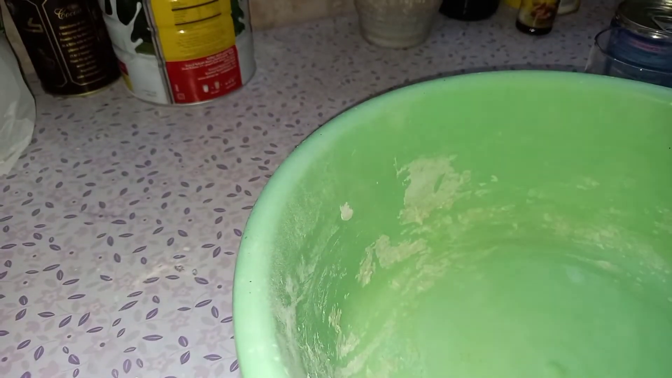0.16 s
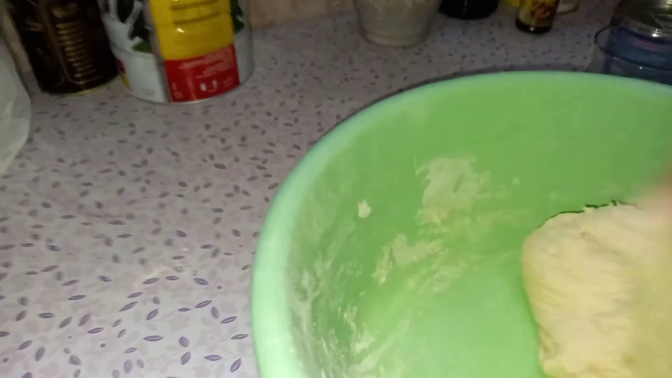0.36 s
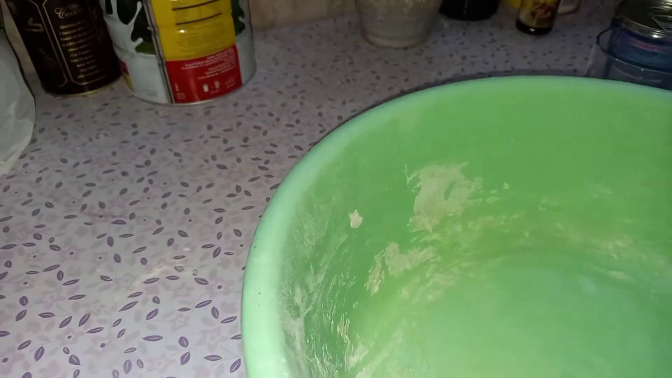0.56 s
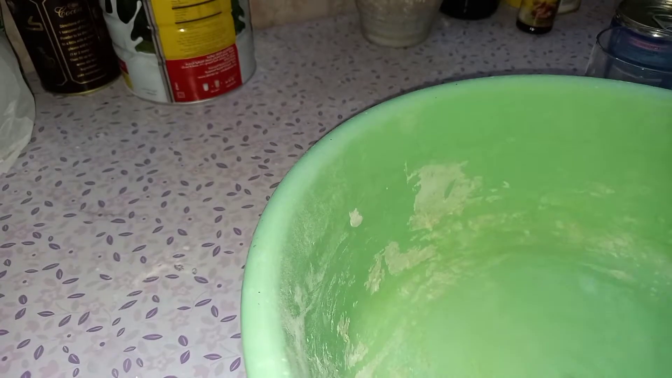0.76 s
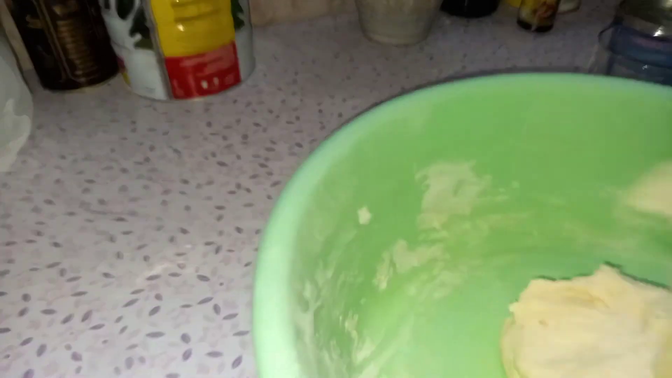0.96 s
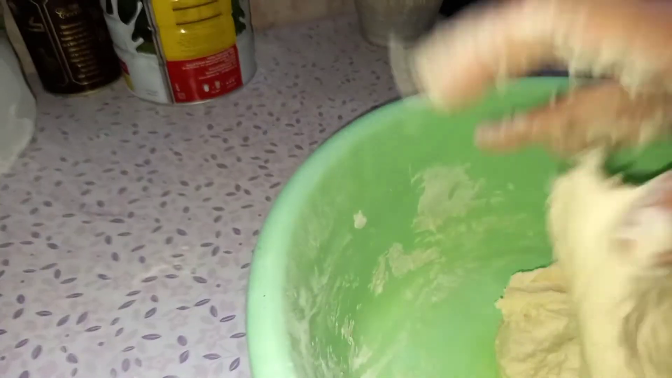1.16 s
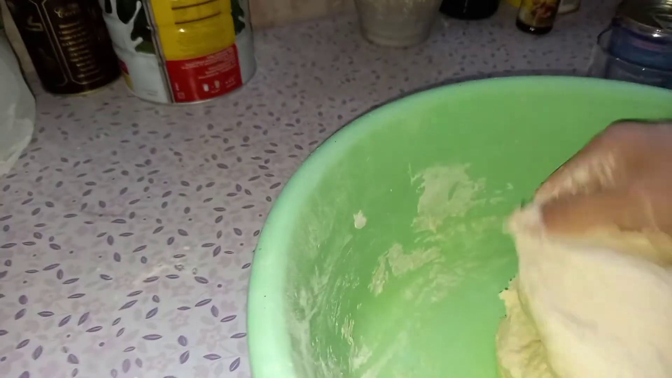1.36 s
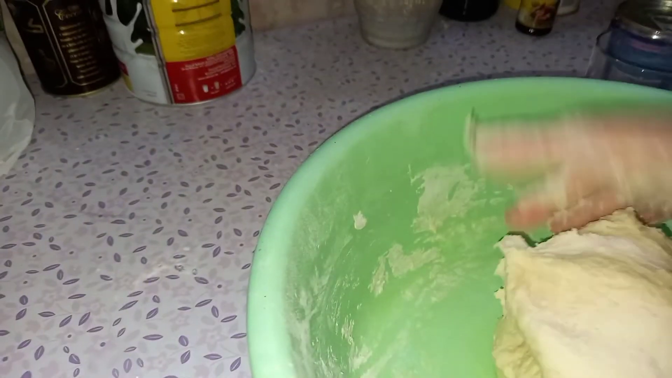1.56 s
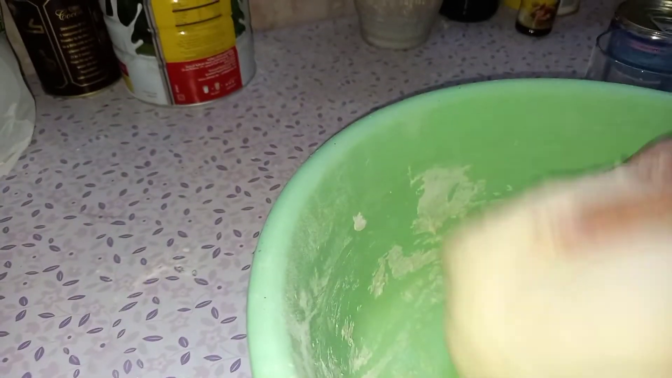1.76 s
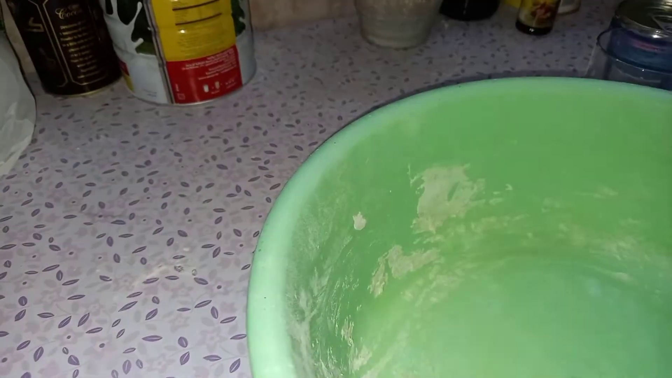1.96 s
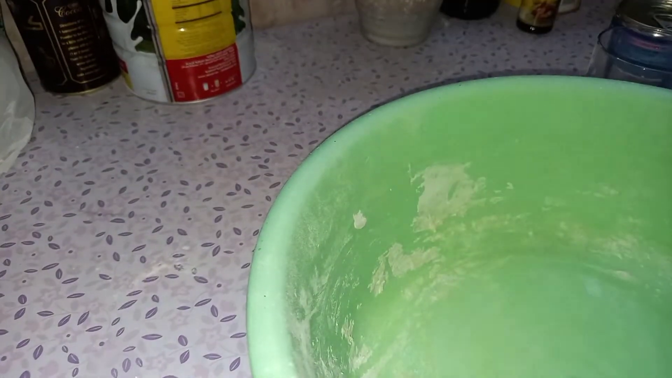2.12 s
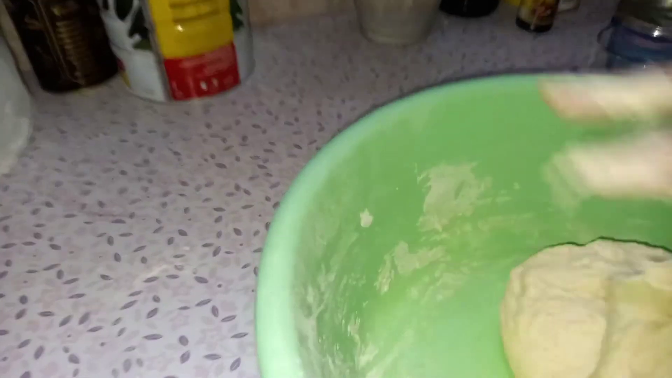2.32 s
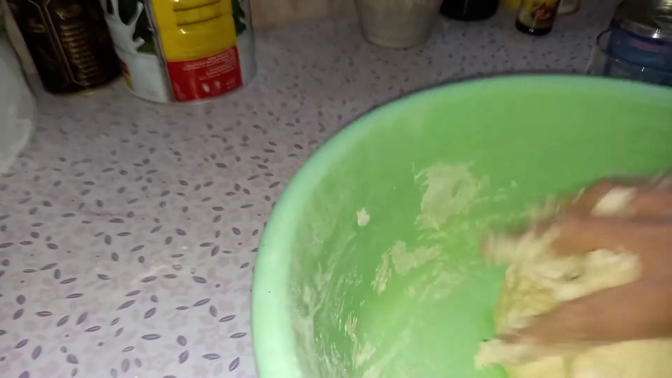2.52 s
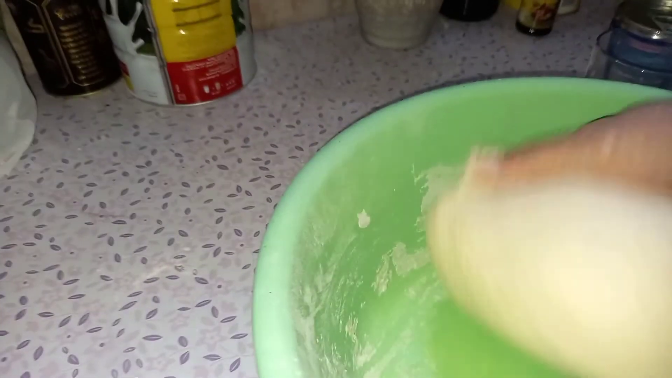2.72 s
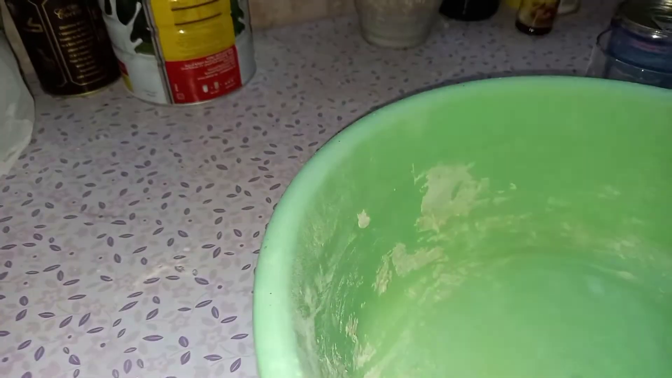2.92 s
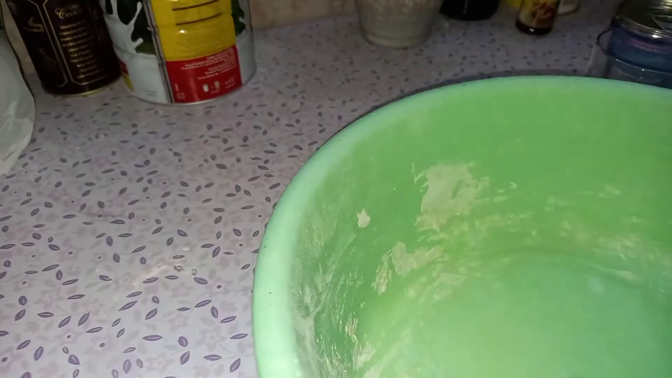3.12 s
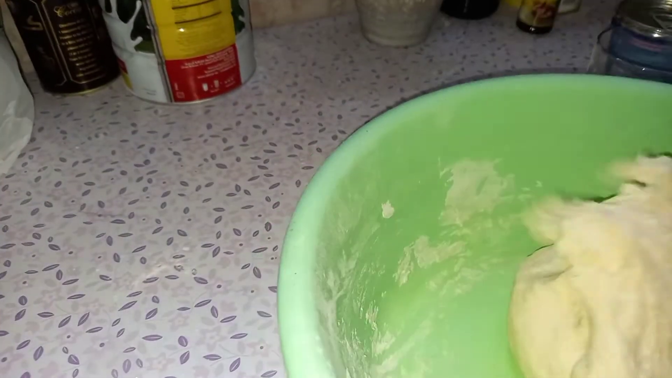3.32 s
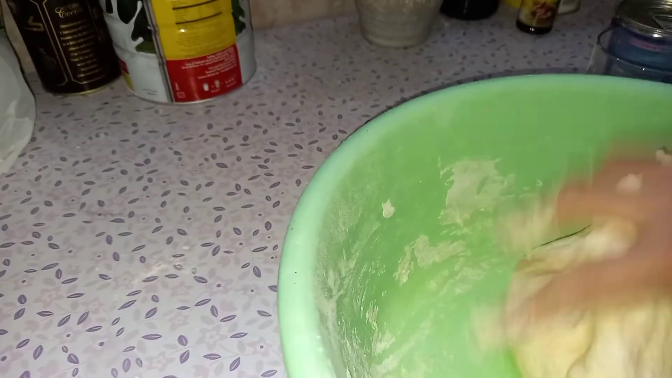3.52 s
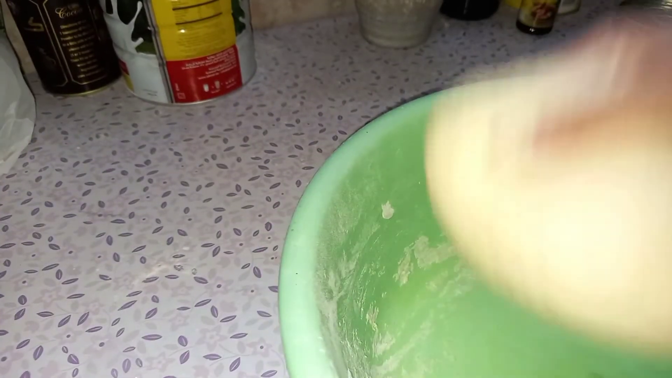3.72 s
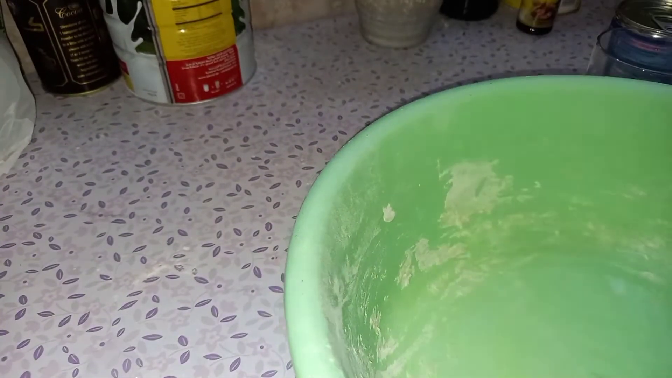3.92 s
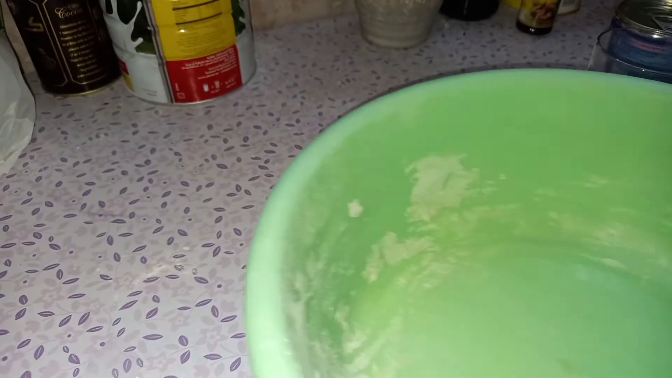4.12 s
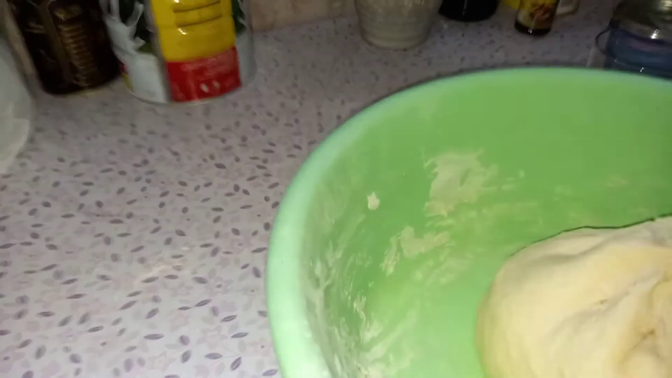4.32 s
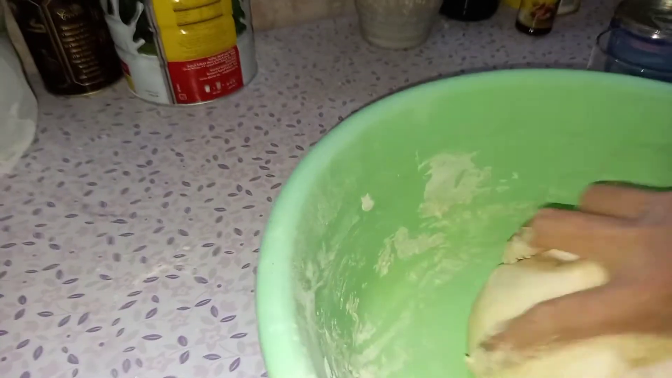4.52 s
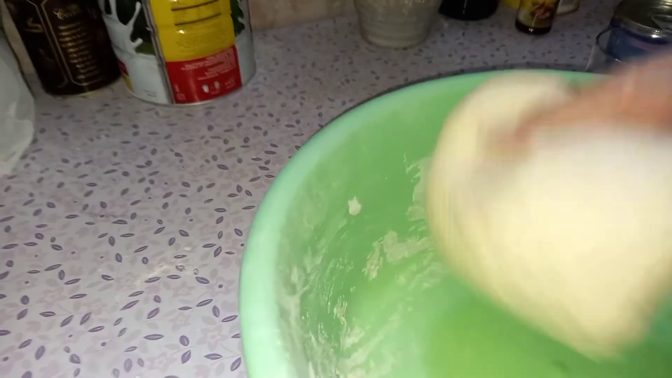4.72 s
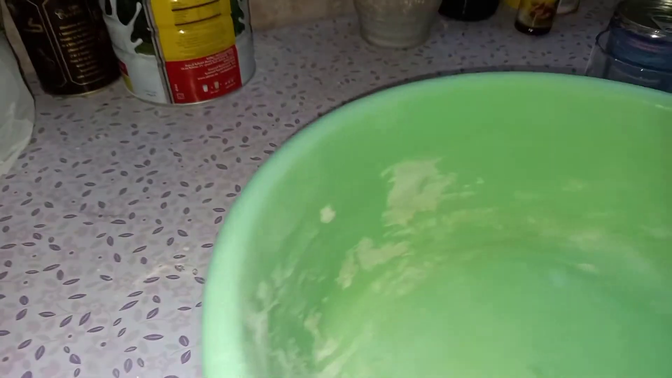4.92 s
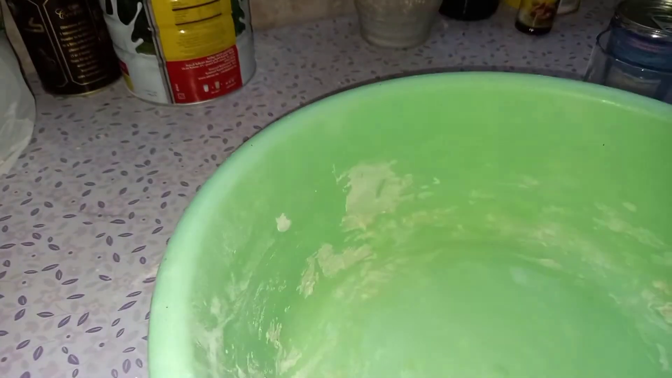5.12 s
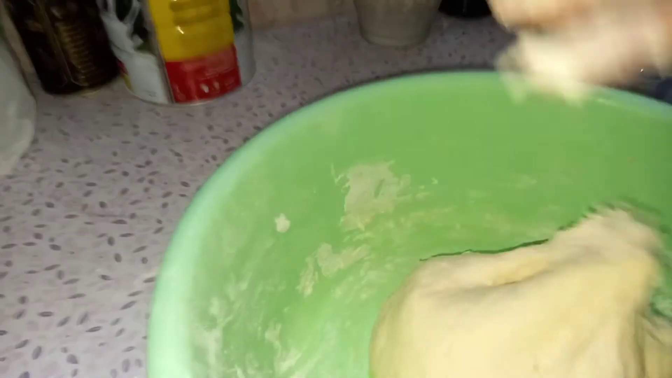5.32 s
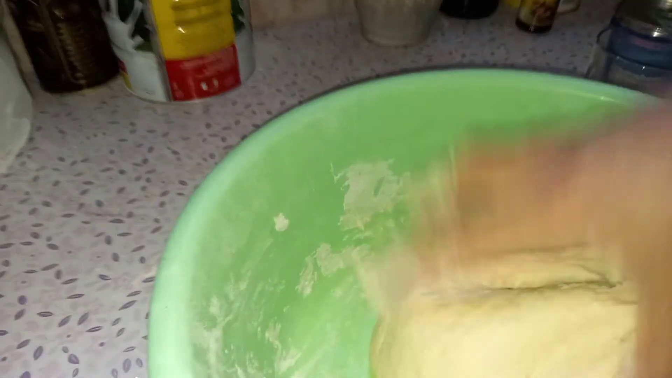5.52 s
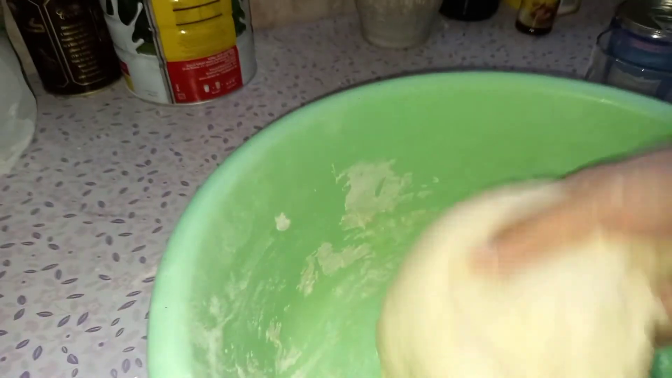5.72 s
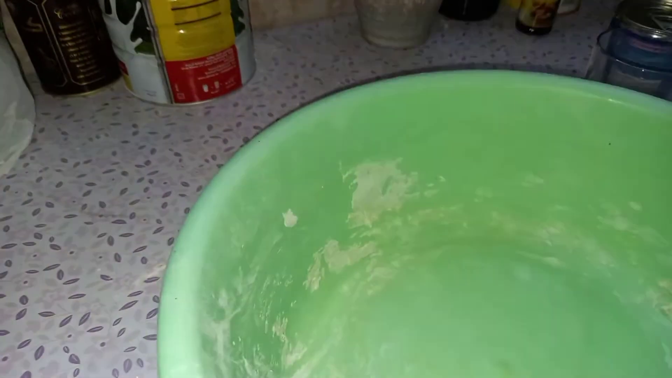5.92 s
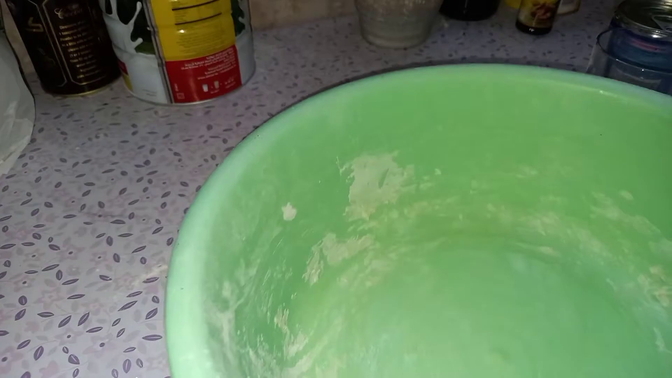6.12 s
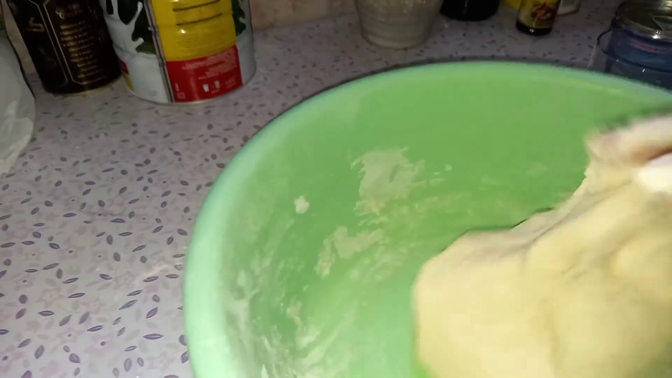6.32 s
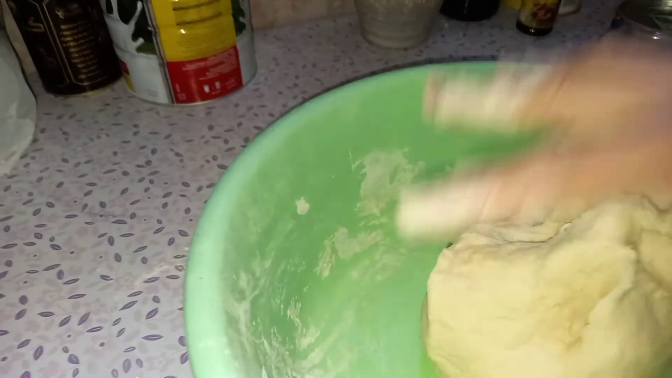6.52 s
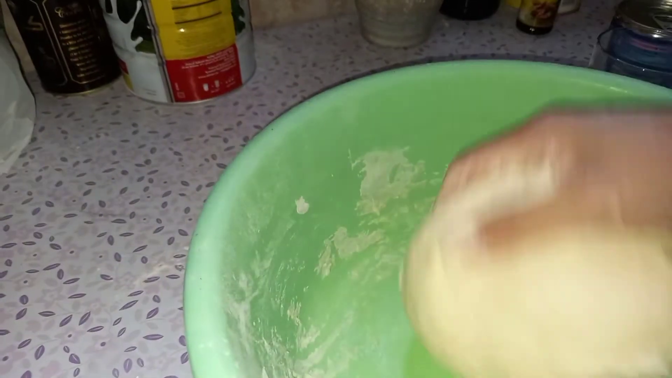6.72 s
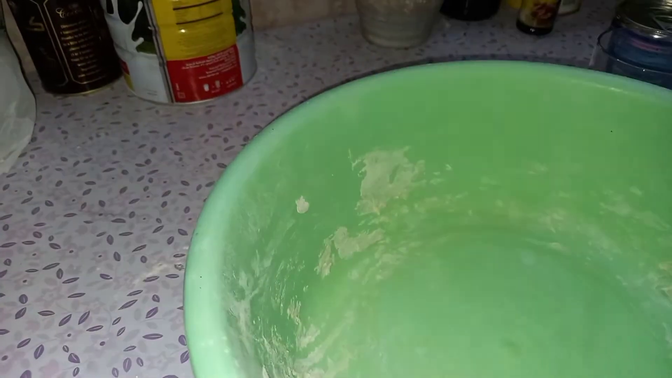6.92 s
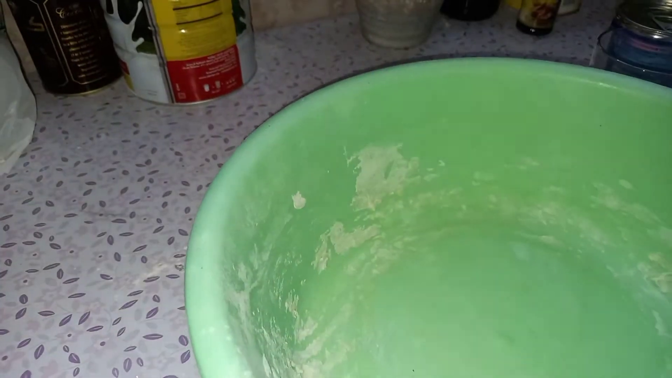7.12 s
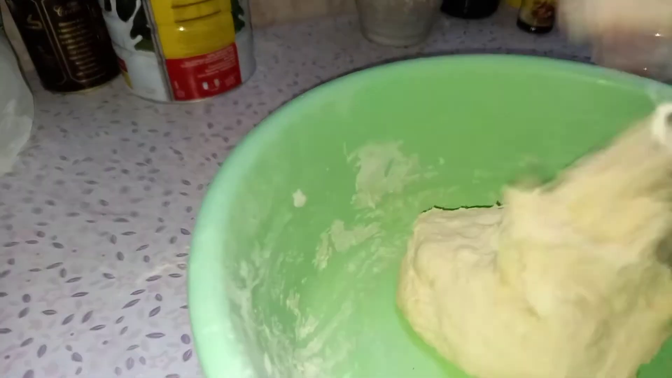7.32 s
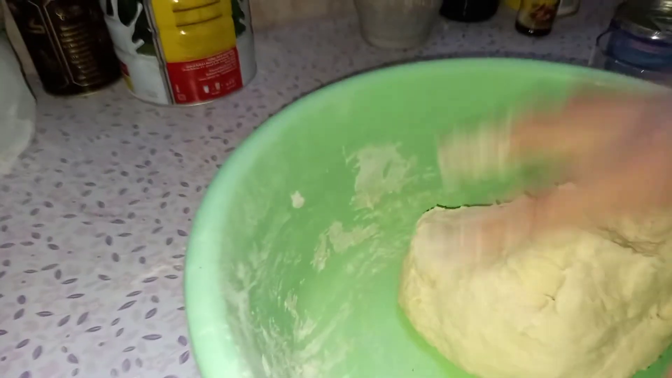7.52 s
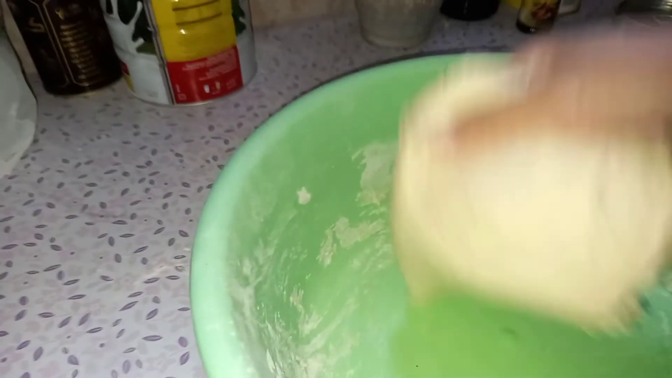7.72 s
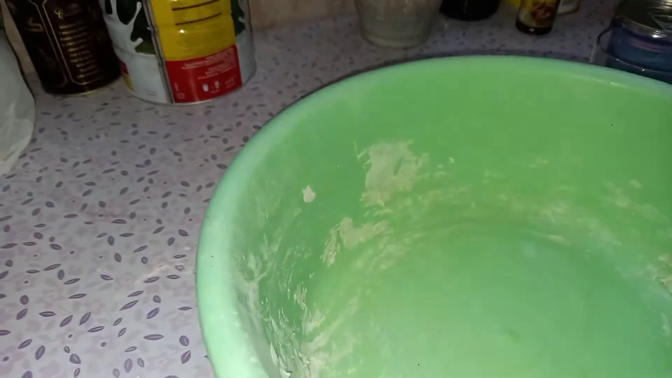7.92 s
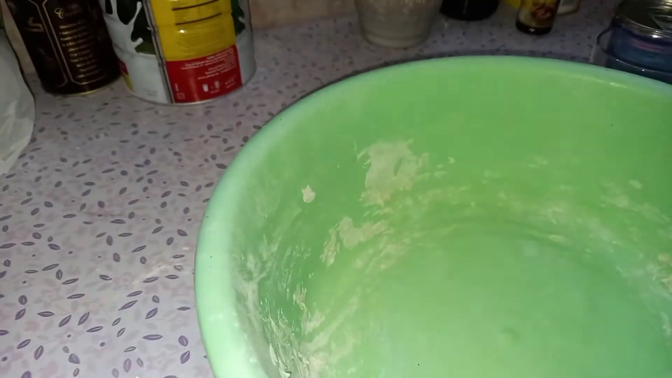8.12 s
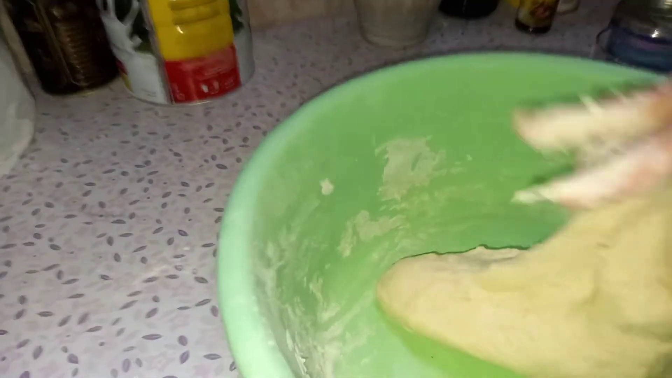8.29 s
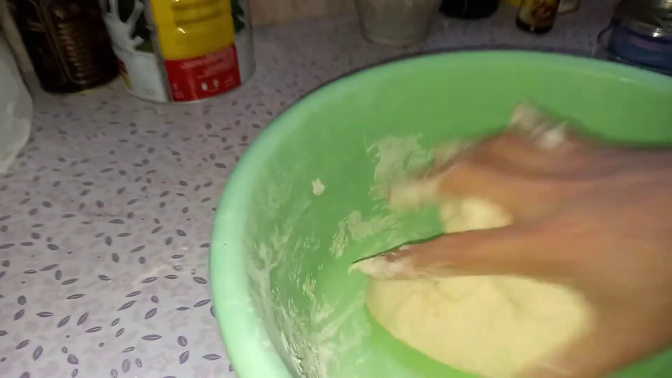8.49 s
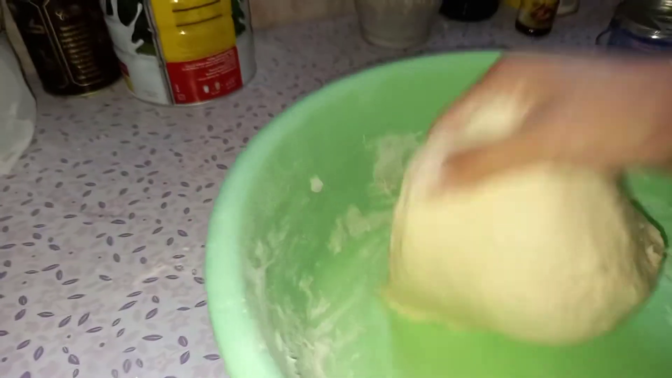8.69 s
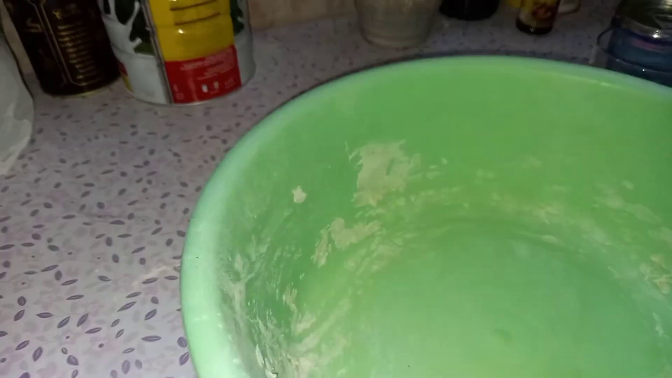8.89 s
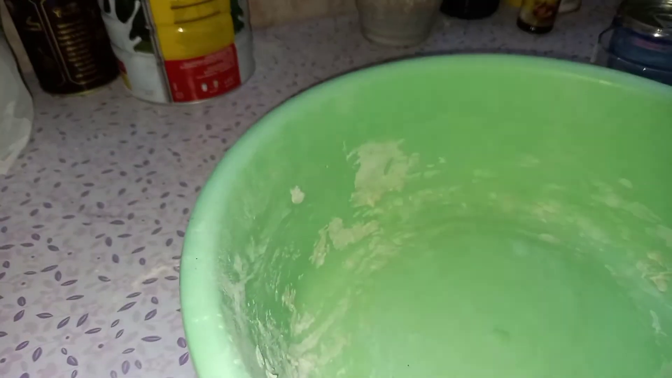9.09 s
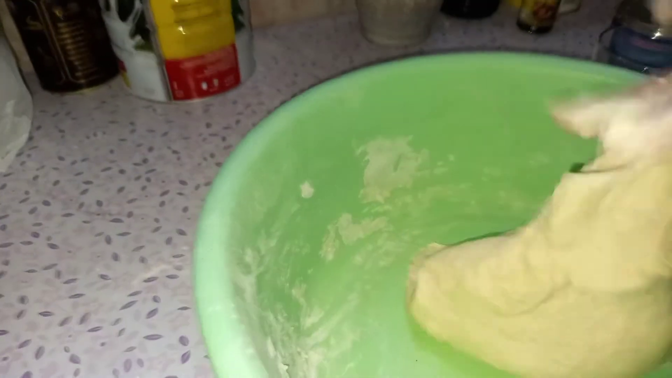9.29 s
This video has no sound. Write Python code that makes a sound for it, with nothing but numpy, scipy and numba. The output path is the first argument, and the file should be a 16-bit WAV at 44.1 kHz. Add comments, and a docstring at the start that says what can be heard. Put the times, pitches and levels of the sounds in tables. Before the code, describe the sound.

Repeated wet, booming dough slams in a plastic bowl on a kitchen counter, with soft pats, peeling and dragging between the blows.

```python
"""Wet slaps and deep booms: a lump of soft dough is thrown again and again into a plastic bowl on a counter.
Each slam is a crackling noise burst, a decaying boom of the counter and a sum of bowl modes; a jar clinks after some.
Between slams, soft blows and grainy friction noise are hands that pat, peel and drag the dough; once a squeak sinks.
A small hard room answers with diffuse decaying noise. Behind it lie a faint two-partial appliance hum and still air."""
import sys
import numpy as np
from scipy import signal
from scipy.fft import rfft, irfft, next_fast_len
from scipy.io import wavfile
from scipy.ndimage import uniform_filter1d
from numba import njit

SR = 44100
rng = np.random.default_rng(int(sys.argv[2]) if len(sys.argv) > 2 else 0)


def boost(x):
    """Linear amplitude factor 10**(x/20) for a level x in decibels (scalar or array-like)."""
    u = np.asarray(x, float) / 20
    return 10 ** u


def dump(signal):
    """Clip the signal to [-1, 1] and save it as 16-bit WAV at the path in sys.argv[1]."""
    limited = np.clip(np.atleast_2d(signal).T, -1, 1)
    pcm = np.round(limited * 32767).astype(np.int16)
    wavfile.write(sys.argv[1], SR, pcm)


N = 412322
T = np.arange(N) / SR  # time in seconds


def on_log(points, hz):
    """Interpolation on a log-frequency axis: a table of (Hz, value) read at the given frequencies."""
    f, v = np.transpose(points)[:2]
    return np.interp(np.log(np.maximum(hz, 1)), np.log(f), v)


def colour(x, points):
    """Minimum-phase filtering: a causal (Hz, dB) spectrum, scaled to keep the power of white noise."""
    gain = boost(on_log(points, np.fft.rfftfreq(2048, 1 / SR)))
    cepstrum = irfft(np.log(gain / np.sqrt(np.mean(gain ** 2))))
    # folding the cepstrum onto positive times makes the response causal
    cepstrum[1:1024] *= 2
    cepstrum[1025:] = 0
    taps = irfft(np.exp(rfft(cepstrum)))
    taps = np.broadcast_to(taps, x.shape[:-1] + taps.shape)
    return signal.oaconvolve(x, taps, axes=-1)[..., :x.shape[-1]]


def band(x, lo_hz, hi_hz):
    """Band-pass filtering, scaled to keep the power of white noise."""
    sos = signal.butter(2, [lo_hz, hi_hz], "band", fs=SR, output="sos")
    return signal.sosfilt(sos, x) * np.sqrt(SR / 2 / (hi_hz - lo_hz))


def wide(size, alike):
    """Interchannel coherence: two noises whose likeness follows a (Hz, 0-1) table."""
    c = np.clip(on_log(alike, np.fft.rfftfreq(size, 1 / SR)), 0, 1)
    mid, side = rfft(rng.standard_normal((2, size)))
    mid = mid * np.sqrt((1 + c) / 2)
    side = side * np.sqrt((1 - c) / 2)
    return irfft(np.array([mid + side, mid - side]), size)


def walk(rate):
    """Smoothed random fluctuation: fresh values at the given rate per second, with spread near 1."""
    k = int(SR / rate)
    steps = np.repeat(rng.standard_normal(N // k + 1), k)
    return 0.65 * uniform_filter1d(uniform_filter1d(steps, k), k)[:N]


def fade(t, t60):
    """Exponential decay: the amplitude falls by 60 dB in t60 seconds."""
    return np.exp(-np.log(1000) * t / t60)


def swell(start_s, length_s, power=2):
    """Raised-sine envelope: the given power of half a sine, zero outside its span."""
    return np.sin(np.pi * np.clip((T - start_s) / length_s, 0, 1)) ** power


# Modes of bowl and counter. Each row: nominal frequency in Hz, relative level in dB, decay time t60 in seconds.
BOWL_MODES = [(100, 5.5, 0.25), (124.7, 0, 0.39), (153.2, 2.5, 0.27), (175, -2.5, 0.14), (243.3, -4, 0.29),
              (286.1, 1, .22), (314, -27, 1.1), (337.6, 5, 0.11), (395, -3, 0.034), (442, -27, 0.36),
              (492, -9, 0.3), (560, -5, 0.17), (690, -9, 0.28), (835, -7.5, 0.072), (918, -5.5, 0.13),
              (1600, -8.5, 0.065)]
# Basic spectrum of the slap. Each row: frequency in Hz, relative density in dB per Hz.
SLAP_SPECTRUM = [(100, -2), (300, -1.5), (700, 1.5), (1000, -1.5), (1250, -4), (1600, 4), (1900, -6.5),
                 (2600, -7.5), (4000, -14), (5500, -12.5), (6600, -15.5), (9000, -19), (13000, -12.5),
                 (16000, -22.5)]
# Likeness of left and right in the slap from a broad patch. Each row: frequency in Hz, likeness from 0 to 1.
PATCH_LIKENESS = [(200, 0.4), (600, 0.25), (1500, 0.02), (5000, 0), (16000, 0)]
BOOM_T60_S, BOOM_LATE_S = 0.15, 0.0045  # decay of the boom; time shift of its cosine


def blows(rows, push_s):
    """Impact excitation: a noise burst while the patch spreads, with damped modes driven by a soft push."""
    slaps, body, t = np.zeros((2, N + SR)), np.zeros(N + SR), T[:SR * 3 // 4]
    hz, db, t60 = np.transpose(BOWL_MODES)[:, :, None]
    for s, slap_db, boom_db, boom_hz, ring_db, treble_db, spread_s in rows:
        i = int(s * SR)
        chance = rng.standard_normal((3, len(BOWL_MODES), 1))
        slap_t = t[:SR // 5]
        u = slap_t / spread_s
        # trapped air pops out in bursts as the contact patch grows
        pops = wide(len(u), PATCH_LIKENESS) * boost(3 * np.repeat(rng.standard_normal(len(u) // 30), 30))
        spreading = u * np.exp(1 - u)
        # the sticky lump keeps crackling in clumps while it settles
        clumps = boost(5 * np.repeat(rng.standard_normal(len(u) // 210), 210))
        settling = boost(-24) * clumps * (1 - np.exp(-u)) * fade(slap_t, 0.34)
        slap = colour(pops * (spreading + settling), SLAP_SPECTRUM)
        # a harder, flatter contact is brighter
        slap = colour(slap, [(800, 0), (1900, treble_db), (20000, treble_db)])
        slaps[:, i:i + len(u)] += boost(slap_db) * slap
        # the soft lump pushes for a while, so the low rings swell before they fade
        push = 1 - np.exp(-(t / push_s) ** 2)
        boom = push * fade(t, BOOM_T60_S) * np.cos(2 * np.pi * boom_hz * (t - BOOM_LATE_S))
        # each blow scatters the modes in level, pitch and phase; a dull one excites the high modes less
        gain = boost(db + 2.3 * chance[0] + min(2 * treble_db, 0) * (hz > 1200))
        turn = 2j * np.pi * hz * (1 + 0.012 * chance[1]) - np.log(1000) / t60
        modes = gain * np.exp(turn * t + 2j * chance[2]).imag
        body[i:i + len(t)] += boost(boom_db + 8) * boom + boost(ring_db - 2.5) * push * modes.sum(0)
    return slaps[:, :N], body[:N]


# Dough landing. Each row: start in seconds, relative slap level in dB, relative boom level in dB,
# boom frequency in Hz, spreading time in seconds.
SLAMS = [(.309, -20, -11.5, 78, .0045), (.946, -3.5, -3, 82, .0017), (2.276, -6, -4.5, 79.8, 0.0019),
         (3.275, -21.5, -19.5, 79.1, 0.0026), (4.223, -6, -2.5, 83.95, .0017),
         (5.269, -2, -4, 80.53, .0014), (6.313, -13.5, -18.5, 99.7, 0.0018),
         (7.307, -9, -5.5, 80.35, 0.0014), (8.234, -7.5, -7.5, 77.6, 0.0014),
         (8.829, -11.5, -10, 88.7, .0015), (8.85, -13, -15.5, 86.1, .0014),
         (9.28, -10.5, -2.5, 83.3, .0035)]
SLAM_RING_DB = -10.5  # ring setting relative to the slap setting


def slams(begin_s, end_s):
    """Inelastic impact: blow settings of the landings between two times, at full treble."""
    return [(s, db, boom_db, hz, db + SLAM_RING_DB, 0, spread_s)
            for s, db, boom_db, hz, spread_s in SLAMS if begin_s <= s < end_s]


# The bowl rocks back onto the counter after a slam. Each row: start in seconds, relative boom level in dB,
# boom frequency in Hz, relative bowl ring level in dB.
REBOUNDS = [(.99, -19.5, 100, -19.5), (2.325, -22.5, 90, -20.5), (4.26, -17.5, 78.65, -24),
            (5.305, -20, 72.7, -23.5), (7.352, -20.5, 84.8, -27), (8.255, -11.5, 73.34, -28),
            (8.277, -22, 87, -25.5), (9.312, -12.5, 82.64, -25)]
REBOUND_SLAP_DB, REBOUND_SPREAD_S = -9, 0.008  # slap setting relative to the ring setting; spreading time


def rebounds(begin_s, end_s):
    """Secondary impact: blow settings of the bowl's returns to the counter between two times."""
    return [(s, db + REBOUND_SLAP_DB, boom_db, hz, db, 0, REBOUND_SPREAD_S)
            for s, boom_db, hz, db in REBOUNDS if begin_s <= s < end_s]


# Lighter knocks and pats: hands and dough touching the bowl, or the bowl rocking back after a slam.
# Each row: start in seconds, relative tick level in dB, relative boom level in dB,
# relative bowl ring level in dB, treble tilt in dB.
LIGHT_KNOCKS = [(.409, -38, -33.5, -38.5, -19), (1.644, -67.5, -49, -65, -28), (1.79, -67, -70, -68, -11.5),
                (2.743, -58, -50, -63, -9.5), (3.354, -36.5, -26, -37.5, -28.5),
                (3.573, -53, -37, -51, -30), (3.714, -50, -40, -53.5, -14.5),
                (4.734, -55.5, -52.5, -56, -12), (5.222, -45, -56, -69.5, 14.5),
                (5.576, -29, -29.5, -42.5, -0.5), (5.814, -53, -50, -54.5, -9), (6.595, -52, -70, -72, 12),
                (6.608, -54.5, -33, -48, -35), (6.793, -44, -27.5, -48, -14.5),
                (7.6, -57, -45.5, -55.5, -13), (7.768, -51.5, -58, -60, -20), (7.791, -57.5, -31, -59, -11),
                (8.774, -37, -20, -34, -14)]
KNOCK_BOOM_HZ, KNOCK_SPREAD_S = 82, 0.0013  # the spreading time is that of a bright knock
SOFTNESS = 0.18  # dB of lengthening per dB of lost treble


def light_knocks(begin_s, end_s):
    """Contact time and bandwidth: a dull contact is a soft one and lasts longer."""
    rows = []
    for s, db, boom_db, ring_db, treble_db in LIGHT_KNOCKS:
        if begin_s <= s < end_s:
            spread_s = KNOCK_SPREAD_S * boost(np.clip(-SOFTNESS * treble_db, 0, 12))
            rows.append((s, db, boom_db, KNOCK_BOOM_HZ, ring_db, treble_db, spread_s))
    return rows


# Jar modes. Each row: frequency in Hz, relative level in dB, decay time t60 in seconds.
JAR_MODES = [(4770, -1.5, 0.3), (4800, -5.5, .3), (3150, -3, .15)]
# A jar on the counter hops and clinks just after a slam. Each row: start in seconds, relative level in dB.
CLINKS = [(2.315, -40), (4.265, -43), (5.31, -45.5), (7.352, -41.5), (8.278, -37.5), (9.315, -39)]


def jar():
    """Modal synthesis: thin glass, struck lightly, rings as a sum of decaying sines."""
    out, t = np.zeros(N + SR), T[:SR // 2]
    hz, db, t60 = np.transpose(JAR_MODES)[:, :, None]
    for s, clink_db in CLINKS:
        i = int(s * SR)
        ring = boost(db) * fade(t, t60) * np.sin(2 * np.pi * (hz * t + rng.random((len(JAR_MODES), 1))))
        out[i:i + len(t)] += boost(clink_db) * (1 - np.exp(-t / 0.0033)) * ring.sum(0)
    return out[:N]


# Dough peeled off the bowl. Each row: moment it lets go in seconds, relative hiss level in dB,
# relative level of the settling rumble in dB.
PEELS = [(1.79, -65.5, -70), (2.75, -68, -61), (3.724, -56.5, -46), (4.73, -57, -39.5), (5.82, -56.5, -40),
         (6.785, -62.5, -37), (7.765, -57, -42), (8.77, -66.5, -44.5)]
PEEL_RISE_DB_S, PEEL_FALL_DB_S, PEEL_HOLD_S = 170, 508, 0.052  # the hold ends as the dough lets go
SETTLE_LATE_S, SETTLE_WIDTH_S = 0.035, 0.042


def peel_envelopes():
    """Adhesive release: hiss grows until the dough lets go, then the bowl settles with a rumble."""
    hiss, rumble = np.zeros((2, N))
    for s, hiss_db, rumble_db in PEELS:
        rise_db = PEEL_RISE_DB_S * np.maximum(s - PEEL_HOLD_S - T, 0)
        fall_db = PEEL_FALL_DB_S * np.maximum(T - s, 0)
        hiss += boost(hiss_db - rise_db - fall_db)
        rumble += boost(rumble_db) * np.exp(-((T - s - SETTLE_LATE_S) / SETTLE_WIDTH_S) ** 2)
    return hiss, rumble


# The bowl or a forearm sliding on the counter. Each row: start in seconds, length in seconds,
# relative hiss level in dB, relative rumble level in dB.
SLIDES = [(3.871, 0.13, -60.5, -73.5), (4.02, .21, -49.5, -48), (4.47, .09, -60, -45.5),
          (4.854, 0.28, -51, -45), (6.853, 0.087, -69, -52)]
RUMBLE_LATE = 0.13  # lag of the rumble as a share of the length


def slide_envelopes():
    """Sliding friction: hiss swells and fades with each stroke, and a rumble follows slightly later."""
    hiss, rumble = np.zeros((2, N))
    for s, length_s, hiss_db, rumble_db in SLIDES:
        hiss += boost(hiss_db) * swell(s, length_s, power=1.1)
        rumble += boost(rumble_db) * swell(s + RUMBLE_LATE * length_s, length_s)
    return hiss, rumble


THROW_DB, THROW_SCATTER_DB, THROW_LEAD_S = -71, 3, 0.05


def throw_envelope():
    """Amplitude envelope: a rustle starts shortly before each slam, peaks with it and fades as fast."""
    hiss = np.zeros(N)
    for row, chance in zip(SLAMS, rng.standard_normal(len(SLAMS))):
        hiss += boost(THROW_DB + THROW_SCATTER_DB * chance) * swell(row[0] - THROW_LEAD_S, 2 * THROW_LEAD_S)
    return hiss


# Spectrum of the rubbing hiss. Each row: frequency in Hz, relative density in dB per Hz.
RUB_SPECTRUM = [(300, -6), (900, -3.5), (1500, 5), (2200, -2.5), (3500, -2), (5000, -3.5), (6500, 0),
                (9000, -2.5), (12000, 1.5), (16000, -2.5)]
# Colour that peeling dough adds to that hiss. Each row: frequency in Hz, relative level in dB.
PEEL_COLOUR = [(250, 5), (800, 8.5), (1500, 1), (2000, -3.5), (6000, -0.5), (16000, -0.5)]


def drags():
    """Friction noise: randomly flickering grain under slow envelopes, over a narrow-band counter rumble."""
    peel, settling = peel_envelopes()
    slide, sliding = slide_envelopes()
    grain = rng.standard_normal(N) * boost(2.5 * walk(330) + 1.2 * walk(31))
    grain = colour(grain, RUB_SPECTRUM)
    hiss = (slide + throw_envelope()) * grain + peel * colour(grain, PEEL_COLOUR)
    return hiss + (settling + sliding) * band(rng.standard_normal(N), 64, 120)


SQUEAK_S, SQUEAK_LENGTH_S, SQUEAK_HZ, SQUEAK_DB = 5.81, 0.35, 900, -65.5  # pitch and level at the start
SAG_HZ_PER_S, SQUEAK_FADE_DB_S = 260, 50


def squeak():
    """Frequency modulation: one thin, wavering sine that sinks and fades."""
    t = T - SQUEAK_S
    edge = np.clip(np.minimum(t / 0.025, (SQUEAK_LENGTH_S - t) / 0.01), 0, 1)
    elapsed = np.clip(t, 0, 1)
    hz = (SQUEAK_HZ - SAG_HZ_PER_S * elapsed) * (1 + 0.025 * walk(110))
    db = SQUEAK_DB - SQUEAK_FADE_DB_S * elapsed + 5 * walk(30)
    return edge * boost(db) * np.sin(2 * np.pi * np.cumsum(hz) / SR)


LEFT_RIGHT_DB = -4.5  # left relative to right, well above the bass


def ports(x):
    """Level difference: the bowl is a little nearer the right port; deep bass reaches both alike."""
    bass = signal.sosfilt(signal.butter(1, 300, fs=SR, output="sos"), x)
    return bass + (x - bass) * boost(np.array([[LEFT_RIGHT_DB], [-LEFT_RIGHT_DB]]) / 2)


# Likeness of left and right in diffuse sound. Each row: frequency in Hz, likeness from 0 to 1.
DIFFUSE_LIKENESS = [(60, 0.8), (290, 0.5), (640, 0.1), (1400, 0), (16000, 0.3)]
# Room echo. Each row: frequency in Hz, decay time t60 in seconds, relative level in dB.
ROOM = [(90, .5, -16.5), (180, 0.18, -11.5), (350, 0.34, -5.5), (730, 0.39, -9.5), (1410, .33, -14),
        (2900, 0.31, -5), (5800, 0.36, -10.5), (11600, 0.22, -5)]


def room(x):
    """Diffuse-field energy balance: in half-octave steps, power fed in builds a field that dies away."""
    size, out = next_fast_len(len(x) + SR // 10), 0
    f = np.fft.rfftfreq(size, 1 / SR)
    source, noise = rfft(x, size), rfft(wide(size, DIFFUSE_LIKENESS))
    levels = [(hz, db) for hz, t60, db in ROOM]
    build = np.exp(-1 / (0.0048 * SR))  # first echoes need a few ms
    for hz in 64 * 2 ** np.arange(0, 8.5, 0.5):
        shape = np.cos(np.pi * np.clip(np.log2(np.maximum(f, 1) / hz), -0.5, 0.5))
        keep = fade(1 / SR, on_log(ROOM, hz)) ** 2
        # each band's power is delayed by 2.4 periods, so that its echo does not precede the blow
        fed = np.roll(irfft(source * shape, size), int(2.4 * SR / hz)) ** 2
        power = signal.lfilter([(1 - keep) * (1 - build)], np.convolve([1, -keep], [1, -build]), fed)
        envelope = np.sqrt(np.maximum(power, 0) / np.mean(shape ** 2))
        out = out + boost(on_log(levels, hz)) * envelope * irfft(noise * shape, size)
    return out[:, :len(x)]


def heard(begin_s, end_s, others):
    """Superposition: the blows between two times and other sounds, direct and through the room."""
    slap, body = blows(slams(begin_s, end_s) + rebounds(begin_s, end_s), push_s=0.0086)
    tick, thud = blows(light_knocks(begin_s, end_s), push_s=0.0081)
    size = len(others)
    slap = (slap + tick)[:, :size]
    body = (body + thud)[:size] + others
    return ports(slap + body) + room(slap[1] + body)


# Appliance hum. Each row: time in seconds, level in dB about which the hum wavers.
HUM = [(0, -60), (1, -61), (1.501, -67.5), (2.2, -66), (3, -65.5), (4, -57.5), (5, -63), (6, -62.5),
       (7, -58), (8.001, -61), (9.35, -58.5)]


def hum():
    """Harmonic synthesis: a low, slowly wavering tone with its octave."""
    s, db = np.transpose(HUM)
    phase = 2 * np.pi * np.cumsum(58 + 1.1 * walk(7.9)) / SR
    tone = np.sin(phase) + boost(-16.5 + 2.8 * walk(5)) * np.sin(2 * phase)
    return tone * boost(np.interp(T, s, db) + 1.2 * walk(7))


# Spectrum of still air. Each row: frequency in Hz, relative density in dB per Hz.
AIR_SPECTRUM = [(30, -24.5), (80, -1.5), (120, -1.5), (170, -13.5), (320, -15), (650, -17.5), (1200, -21.5),
                (3000, -31.5), (5000, -32), (6500, -33), (9000, -22.5), (13000, -21.5), (17000, -25.5)]
AIR_DB = -72  # level about which the air noise wavers


def still_air():
    """Diffuse background noise: coloured, partly alike at left and right, slowly wavering in level."""
    return boost(AIR_DB + 4.5 * walk(4.2)) * colour(wide(N, DIFFUSE_LIKENESS), AIR_SPECTRUM)


CUT_S = 0.47  # the first blows and their echo break off here


def scene():
    """Superposition: slams and handling in the room, over hum and air."""
    cut = int(CUT_S * SR)
    out = heard(CUT_S, np.inf, drags() + squeak() + jar())
    first = heard(0, CUT_S, np.zeros(cut))
    out[:, :cut] += first * np.clip((CUT_S - T[:cut]) / 0.00234, 0, 1)
    return out + hum() + still_air()


@njit
def follow(peak, attack, release):
    """Envelope detection: a one-pole follower that rises fast and falls slowly."""
    out, e = np.empty(len(peak)), 0.
    for i in range(len(peak)):
        e += (peak[i] - e) * (attack if peak[i] > e else release)
        out[i] = e
    return out


LIMIT_DB, LIMIT_RATIO, ATTACK_S, RELEASE_S = -9.5, 1.5, 0.0005, 0.12


def roll_off(x):
    """The treble ends steeply here."""
    return signal.sosfilt(signal.butter(12, 16590, fs=SR, output="sos"), x)


def record(dry):
    """Filtering and compression: a phone loses deep bass and treble, holds blows down and rounds peaks."""
    hz = np.fft.rfftfreq(N, 1 / SR)
    treble_step = boost(-16 / (1 + np.exp(-(hz - 7150) / 120)))
    x = signal.sosfilt(signal.butter(3, 55, "high", fs=SR, output="sos"), dry)
    x = irfft(rfft(x) * treble_step, N)
    # gain control follows the louder channel
    loud = follow(np.abs(x).max(0), 1 / (ATTACK_S * SR), 1 / (RELEASE_S * SR))
    x = x * np.maximum(loud / boost(LIMIT_DB), 1) ** (1 / LIMIT_RATIO - 1)
    return roll_off(np.tanh(x))


dry = scene()
out = record(dry)
dump(out)
```